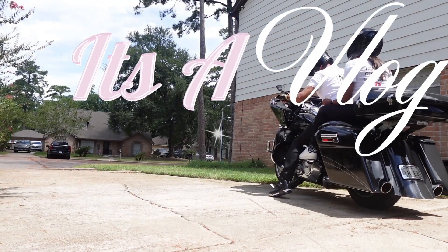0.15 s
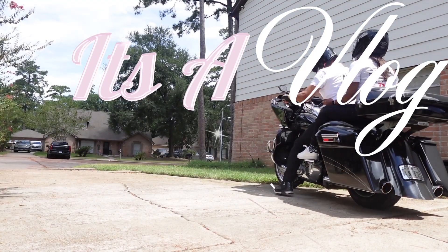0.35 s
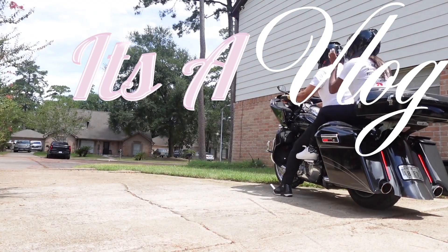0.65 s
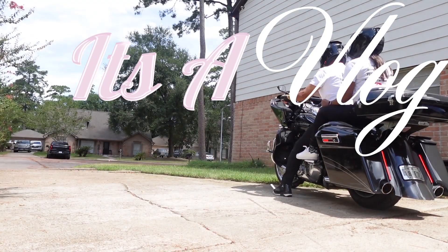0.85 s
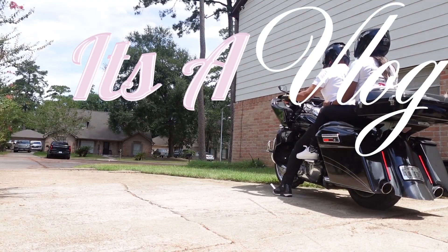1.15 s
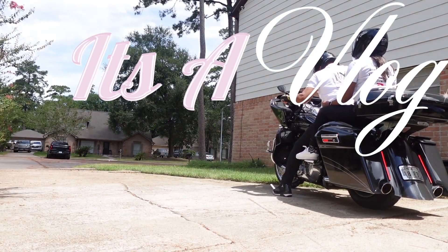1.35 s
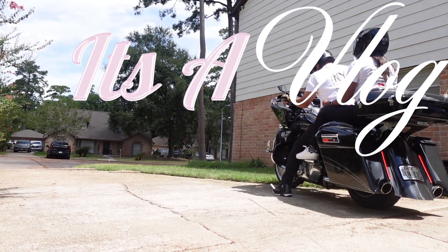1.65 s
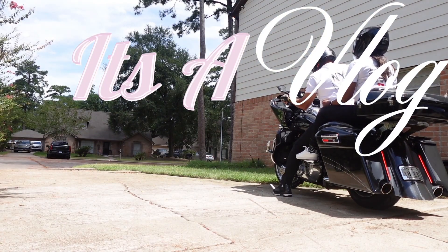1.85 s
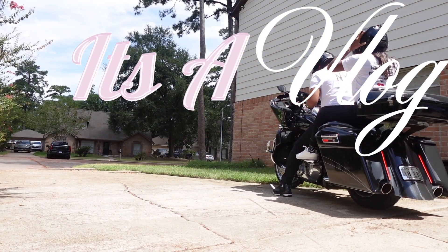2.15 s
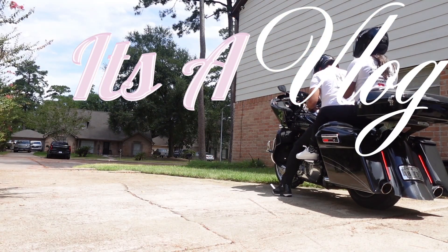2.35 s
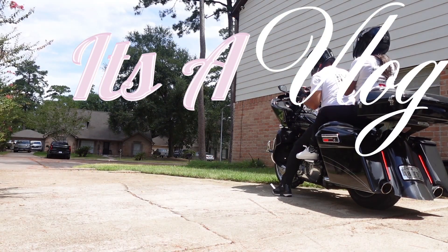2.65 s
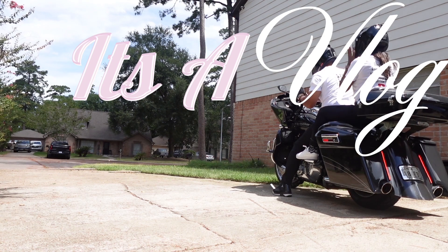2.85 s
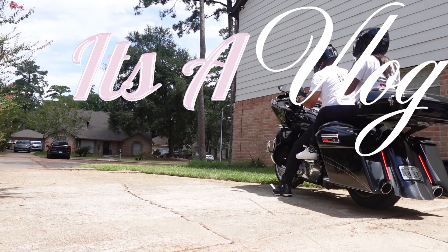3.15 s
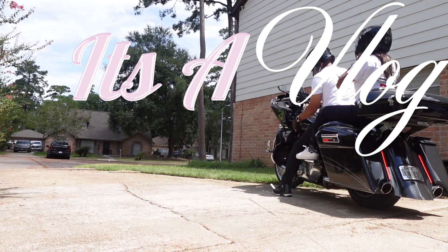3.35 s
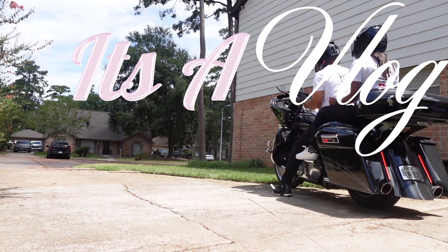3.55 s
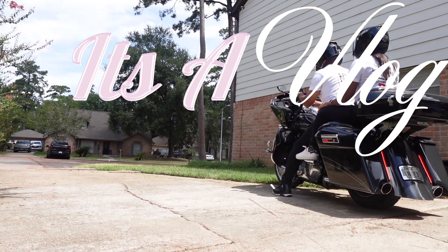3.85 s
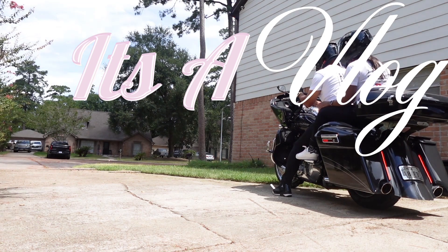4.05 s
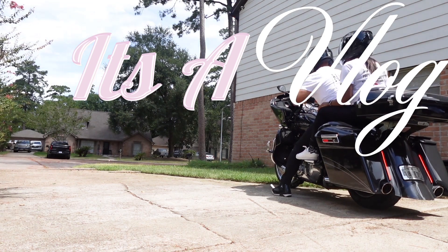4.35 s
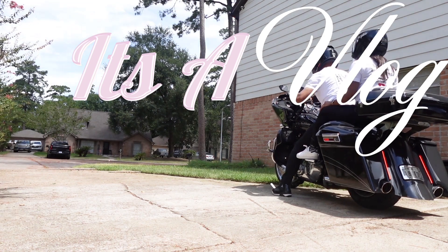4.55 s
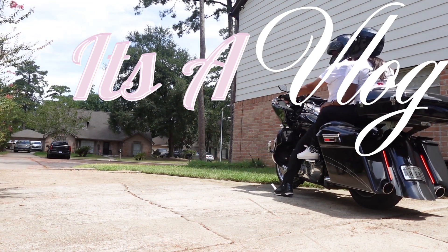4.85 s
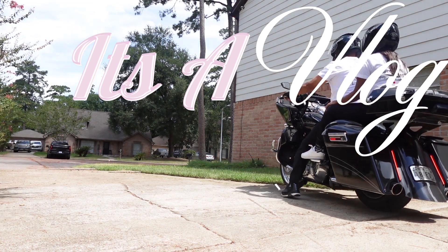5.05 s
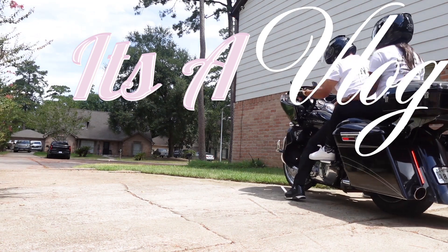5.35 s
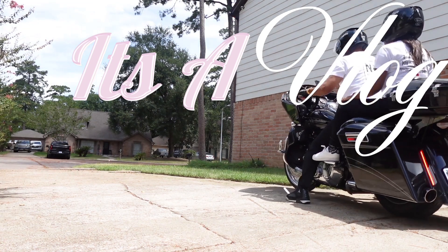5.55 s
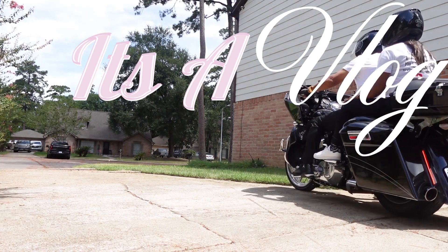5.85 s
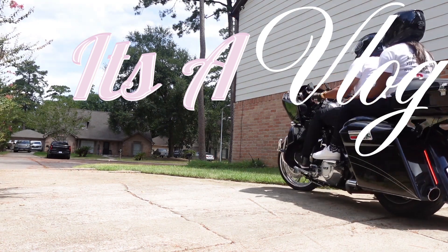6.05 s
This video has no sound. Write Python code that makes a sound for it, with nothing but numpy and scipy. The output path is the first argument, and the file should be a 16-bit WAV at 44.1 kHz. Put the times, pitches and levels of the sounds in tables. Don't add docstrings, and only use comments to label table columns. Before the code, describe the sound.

After quiet clicks and rustles, a motorcycle starter grinds briefly, the big twin catches, flares loudly, then settles to a fast, uneven idle with late metallic clacks.

```python
import sys
import numpy as np
from scipy import signal
from scipy.fft import rfft, irfft
from scipy.io import wavfile
from scipy.ndimage import uniform_filter1d

SR = 44100
rng = np.random.default_rng(int(sys.argv[2]) if len(sys.argv) > 2 else 0)


def store_wav(level_fs):
    pcm = np.round(np.clip(np.atleast_2d(level_fs), -1, 1) * 32767)
    wavfile.write(sys.argv[1], SR, pcm.T.astype(np.int16))


def elevation(decibels):
    levels = np.asarray(decibels, float)
    return 10 ** (levels / 20)


N = 273704
T = np.arange(N) / SR

# freq_hz, density_db
STREET_COLOUR = [(35, -69), (60, -61), (223, -23.5), (598, -3.5), (756, -3.5), (1100, -4), (2280, -8.5),
                 (2500, -8), (3560, -11), (4290, -8), (10500, -14.5), (15200, -14), (16400, -34)]
# freq_hz, level_db
HUMS = [(597.5, -62.5), (1098, -62.5), (1367, -67), (2476, -69), (4323, -72)]
# centre_s, length_s, low_rise_db, high_rise_db
RUSTLES = [
    (0.053, 0.027, 0, 9),
    (0.198, 0.048, 0.5, 2.5),
    (0.405, 0.022, 4, -1),
    (0.757, 0.058, 3, 4),
]
STREET_DB, RUSTLE_DB, SWELL_DB = -48.5, -51.5, .7
# start_s, peak_db, ring_hz, t60_s
CLICKS = [(0.3972, -26, 3900, 0.0056), (0.397, -29, 1700, .008), (.3978, -36, 7000, .004),
          (0.69, -27, 8160, 0.01), (0.6756, -19, 8300, 0.0063), (.6248, -29, 12000, .006),
          (.6252, -31, 5700, .006), (.676, -30, 15000, .005), (.676, -29, 6000, .006),
          (.543, -42, 11000, .004), (.3975, -42, 9000, .004), (.757, -42, 8000, .008),
          (0.7053, -33, 9100, 0.015), (0.7154, -34, 7280, 0.018), (0.7552, -38, 5840, 0.015),
          (1.123, -11, 4090, .03), (1, -19, 4350, 0.038), (5.4, -22, 3400, .012)]
# start_s, peak_db, ring_hz, t60_s
TAPS = [
    (0.196, -36, 1370, 0.046),
    (0.396, -39, 1110, 0.033),
    (0.7264, -29, 1350, 0.024),
    (0.787, -37, 1470, 0.029),
    (0.819, -45, 1080, 0.04),
]
# time_s, pitch_hz, level_db
PUMP = [
    (.72, 12500, -62),
    (.77, 12450, -51),
    (.98, 12100, -58),
]

# start_s, length_s, grind_db, thud_db
STROKES = [
    (0.991, .008, -22, -40),
    (0.997, 0.0093, -20, -30),
    (1.012, 0.013, -18.5, -35),
    (1.049, 0.0089, -22, -35),
    (1.06, 0.017, -19, -27.5),
    (1.088, 0.018, -18.5, -36),
    (1.099, 0.0054, -25, -25),
    (1.122, 0.011, -17.5, -60),
    (1.135, 0.054, -21, -20.5),
]
STROKE_RISE_S, STROKE_T60_S = 0.0021, 0.093
# freq_hz, density_db
GRIND = [(1180, -34), (2000, -7.5), (2790, -6.5), (4150, 0.5), (5170, -4.5), (5550, -3), (9910, -8),
         (14600, -3.5), (16400, -14)]
# freq_hz, width_hz, level_db
GEARS = [(3900, 350, -9), (4300, 200, -5), (5530, 130, 2.5), (6400, 200, -3), (7500, 320, -5),
         (8800, 200, -7)]

# time_s, rate_cycles_per_s
SPEED = [(1.13, 53.9), (1.26, 67.5), (1.467, 67.095), (1.577, 64.568), (1.654, 61.541), (1.841, 62.956),
         (1.98, 58.475), (2.061, 56.87), (2.152, 51.981), (2.361, 51.89), (3.37, 51.583), (3.525, 50.011),
         (6.264, 49.02)]
# centre_s, change_cycles_per_s
SURGES = [(2.415, 1.096), (3.059, -1.63), (3.114, 0.787), (3.375, 2.547), (3.83, 1.844), (4.026, -1.773),
          (4.433, 1.766), (4.679, 1.788), (4.968, 2.051), (5.155, -0.528), (5.228, -2.352), (5.596, 2.625),
          (5.895, -0.491), (6.01, 1.657)]
SURGE_S = .0713
# time_s, level_db
ENGINE = [(1.14, -22), (1.195, -16.5), (1.215, -12.5), (1.24, -10.5), (1.3, -11), (1.65, -11.5),
          (2.15, -13.5), (2.8, -13), (3.3, -13.5), (3.9, -12.5), (6.21, -13)]
# time_s, state (0 flare, 1 dropping, 2 settling, 3 pulling), unevenness_ratio
THROTTLE = [(1.14, 0, 2), (1.195, 0, 1.2), (1.225, 0, .5), (1.29, 0, .11), (1.49, 0, .11), (1.58, 1, .1),
            (2.04, 1, .12), (2.17, 2, .12), (3.4, 2, .12), (3.55, 2, .13), (6.2, 2, .14)]
# time_s, pulling_chance_ratio
PULL_CHANCE = [(2.2, .03), (3.4, .1), (3.5, .8), (3.62, .7), (3.68, .15), (3.88, .05), (3.93, .95),
               (4.05, .7), (4.3, .6), (4.36, .03), (4.5, .1), (4.78, .9), (4.95, .4), (5.08, .95),
               (5.45, .85), (5.52, .1), (5.65, .7), (6.2, .9)]
QUIET_SHARE = .38
CATCH_S = 1.14
# centre_s, length_s, change_db
DUCK = (6.133, .013, -8)

# multiple_of_cycle_rate, level_db
FLARE = [(1, -58), (2, -50), (3, -38), (4, -27), (5, -12), (6, -16), (7, -5), (8, -10), (9, -2), (10, -7),
         (11, -8), (12, -1), (13, -13), (14, 0), (15, -14), (16, -6), (17, -13), (18, -11), (19, -15),
         (20, -12), (21, -15), (22, -18), (23, -16), (24, -17), (25, -16), (26, -19), (27, -31), (28, -21),
         (29, -27), (30, -30), (31, -26), (32, -25), (33, -21), (34, -29), (35, -24), (36, -28)]
# multiple_of_cycle_rate, level_db
DROPPING = [(1, -59), (2, -60), (3, -41), (4, -24), (5, -14), (6, -22), (7, -8), (8, -9), (9, -4), (10, -4),
            (11, -7), (12, 0), (13, -3), (14, -10), (15, -10), (16, -6), (17, -8), (18, -6), (19, -15),
            (20, -11), (21, -13), (22, -20), (23, -22), (24, -24), (25, -19), (26, -23), (27, -24),
            (28, -24), (29, -21), (30, -24), (31, -26), (32, -29), (33, -29), (34, -30), (35, -32),
            (36, -35)]
# multiple_of_cycle_rate, level_db
SETTLING = [(1, -57), (2, -58), (3, -51), (4, -28), (5, -15), (6, -22), (7, -14), (8, -18), (9, -4),
            (10, -1), (11, -2), (12, 0), (13, -12), (14, -5), (15, -9), (16, -10), (17, -11), (18, -6),
            (19, -15), (20, -17), (21, -11), (22, -25), (23, -21), (24, -23), (25, -33), (26, -17),
            (27, -18), (28, -30), (29, -29), (30, -17), (31, -24), (32, -29), (33, -23), (34, -18),
            (35, -26), (36, -32)]
# multiple_of_cycle_rate, level_db
PULLING = [(1, -60), (2, -60), (3, -48), (4, -27), (5, -16), (6, -23), (7, -15), (8, -21), (9, -6),
           (10, -2), (11, -3), (12, -2), (13, -11), (14, -8), (15, -5), (16, -6), (17, -3), (18, -16),
           (19, -10), (20, -13), (21, -25), (22, -12), (23, -25), (24, -19), (25, -20), (26, -13),
           (27, -15), (28, -20), (29, -26), (30, -23), (31, -18), (32, -29), (33, -23), (34, -20),
           (35, -26), (36, -30)]
BITE = [0.022, 0.017, 0.035, 0.047]
# cycle_share, level_db
WAVES = [
    [(.072, -5.8), (.09, -12.2), (.186, -9.6), (.619, -9.5), (.715, -13.1), (.841, -8.5)],
    [(.027, -.9), (.457, -6.2), (.514, -7.7), (.522, -3.9), (.562, -5.1), (.699, -5.7)],
    [(.136, -5), (.155, -3.7), (.571, -6.6), (.796, -7.9), (.85, -3.3), (.998, -2.8)],
    [(.132, -2.3), (.163, 1), (.359, -9.1), (.583, -6.6), (.745, -6.8), (.786, -.1)],
]
PIPE = [
    (.834, .48),
    (1.424, -.61),
    (.218, 2.66),
    (.218, 3.1),
]
# cycle_share, level_db
FRONTS = [
    [(.231, -3.8), (.386, -7.9), (.8, -8.8), (.911, -2)],
    [(.152, -8.7), (.202, -8.3), (.6, -4.1), (.699, -6.9)],
    [(.184, -2.2), (.246, -15), (.551, -7.5), (.911, -3.6)],
    [(.182, -.6), (.297, -5.2), (.446, -6.9), (.557, -5.3), (.839, -6)],
]
FRONT_TWIST = [-1.4, 2.5, -1.09, 5.4]
FRONT_FROM = 20
FRONT_JITTER_CYCLES, FRONT_SCATTER_DB = .015, 14
LOPE_DB = 1.6

RASP_DB = [-23, -24, -17, -16]
RASP_HZ, RASP_WIDTH_HZ, RASP_SHARE = 830, 220, .0
# multiple_of_cycle_rate, level_db
ALTERNATE = [(13.5, -20), (15.5, -19), (16.5, -20), (20.5, -27), (25.5, -28)]

# cycle_share, knock_db, hiss_db
BEATS = [
    (.065, 0, 0),
    (.39, -9, -3),
    (.49, -11, -1),
    (.79, -10, -2),
]
# multiple_of_cycle_rate, decay_cycles, level_db, lag_cycles
KNOCK = [(41.5, .04, 11.5, .04), (33, .035, 1, .08), (64, .05, 2, 0), (79, .045, 0, .02)]
KNOCK_DB, KNOCK_CATCH_DB, KNOCK_EASE_S, KNOCK_DB_PER_S = -34, 10, .4, 1.2
REV_KNOCK_DB = 8
# freq_hz, density_db
GAS = [(710, -16), (1200, -16), (1370, -8), (1460, -6.5), (1590, -1.5), (2240, -10), (2610, -11.5),
       (3380, -8), (4670, -12.5), (5610, -12.5), (7350, -10.5), (8270, -13), (14800, -16.5), (15800, -19)]
# freq_hz, width_hz, level_db
CASING = [(3100, 360, 0.5), (5580, 290, 1), (11340, 380, -11), (4070, 120, -3.5)]
GAS_DB, GAS_CATCH_DB, GAS_EASE_S = -33.5, 4, .08
WHINE_DB, WHINE_DB_PER_S = -10, 1.8
# start_s, peak_db, ring_hz, t60_s
BANGS = [(1.141, -9, 686, 0.019), (1.15, -10, 1110, 0.016), (1.149, -10, 710, 0.022),
         (1.168, -6, 890, 0.017), (1.179, -6, 945, 0.016), (1.201, -21, 969, 0.016),
         (1.201, -6, 553, 0.033), (1.209, -9, 552, 0.02), (1.22, -5.5, 660, 0.039),
         (1.228, -14, 767, 0.013)]

# start_s, peak_db, t60_s, thump_db
CLACKS = [
    (1.185, -43, .03, -25),
    (1.76, -50, .03, -43),
    (2.859, -36, .03, -31),
    (4.722, -18, 0.055, -71),
    (5.867, -8.5, 0.049, -29),
    (5.878, -19, .05, -60),
    (6.113, -4.5, 0.029, -40),
    (6.124, -4, 0.047, -31),
    (6.134, -5, 0.058, -40),
    (6.198, -40, .01, -43),
]
# start_s, length_s, start_hz, end_hz, level_db
SQUEAKS = [(4.066, 0.01, 3100, 3030, -24), (4.717, 0.031, 5840, 5600, -24), (4.716, .02, 4300, 4170, -28),
           (4.717, .015, 6400, 6700, -30), (4.717, .018, 3200, 3400, -26),
           (4.801, 0.011, 5600, 5600, -23.5), (4.845, 0.035, 5300, 4600, -25),
           (4.846, 0.017, 6900, 6500, -31), (4.846, .02, 15400, 15100, -27),
           (4.887, .022, 14200, 14000, -32), (4.903, .012, 15800, 15200, -33)]
# freq_hz, left_minus_right_db
BALANCE_DB = [(125, 0), (250, -.2), (500, -.6), (1000, -1.1), (2000, -1.8), (4000, -3.2), (8000, -3.2),
              (12000, -2.6)]
BASS_CUT_HZ = 201


def level(x, db):
    return x * elevation(db) / np.sqrt(np.mean(x ** 2))


def noise():
    return rng.standard_normal(N)


def columns(table):
    s, *cols = np.transpose(table)
    return [np.interp(T, s, c) for c in cols]


def colour(x, points):
    hz, db = np.transpose(points)
    log_f = np.log(np.maximum(np.fft.rfftfreq(N, 1 / SR), 1))
    return irfft(rfft(x) * elevation(np.interp(log_f, np.log(hz), db)), N)


def ring(x, hz, width_hz):
    return signal.lfilter(*signal.iirpeak(hz, hz / width_hz, SR), x)


def rings(x, modes):
    return sum(elevation(db) * ring(x, hz, width_hz) for hz, width_hz, db in modes)


def walk(rate_hz):
    knots_s = np.arange(0, N / SR + 1, 1 / rate_hz)
    return np.interp(T, knots_s, rng.standard_normal(len(knots_s)))


def fade(start_s, t60_s, rise_s=.0003):
    t = np.maximum(T - start_s, 0)
    return (1 - np.exp(-t / rise_s)) * elevation(-60 * t / t60_s)


def bump(centre_s, length_s):
    return np.exp(-((T - centre_s) / length_s) ** 2)


def cycle_luck(turn, count):
    return rng.standard_normal((500, count))[np.floor(turn).astype(int) + 1].T


def street():
    low_db = STREET_DB + SWELL_DB * walk(6.8) + sum(d * bump(s, length) for s, length, d, _ in RUSTLES)
    high_db = RUSTLE_DB + sum(d * bump(s, length) for s, length, _, d in RUSTLES)
    wash = colour(noise(), STREET_COLOUR)
    low = signal.sosfilt(signal.butter(2, 2700, fs=SR, output="sos"), wash)
    hums = sum(elevation(db + 5.0) * level(ring(noise(), hz, 6.3), 0) for hz, db in HUMS)
    return level(low, 0) * elevation(low_db) + level(wash - low, 0) * elevation(high_db) + hums


def hits(table):
    out = 0
    for start_s, db, hz, t60_s in table:
        tone = np.sin(2 * np.pi * hz * (T - start_s))
        scrape = colour(noise(), [(hz / 3, -15), (hz, 0), (hz * 2, -4)])
        out = out + elevation(db) * fade(start_s, t60_s) * (tone + 0.46 * scrape)
    return out


def fuel_pump():
    hz, db = columns(PUMP)
    whine = np.sin(2 * np.pi * np.cumsum(hz) / SR)
    return elevation(db + 3 * walk(58)) * whine * (T > .72) * (T < 1)


def starter():
    teeth = colour(noise() * elevation(2.2 * walk(200)), GRIND)
    gears = sum(rings(teeth, [gear]) * elevation(5 + 3 * walk(40)) for gear in GEARS)
    grind = level(teeth + gears, 0)
    thud = level(rings(noise(), [(640, 98, -8), (1120, 400, 6)]), 0)
    out = 0
    for start_s, length_s, grind_db, thud_db in STROKES:
        rise = np.clip((T - start_s) / STROKE_RISE_S, 0, 1)
        fall = elevation(-60 * np.maximum(T - start_s - length_s, 0) / STROKE_T60_S)
        out = out + rise * fall * (grind * elevation(grind_db) + thud * elevation(thud_db))
    return out


def burn(turn):
    cycle = np.floor(turn - QUIET_SHARE).astype(int) + 1
    start = np.searchsorted(cycle, cycle)
    pulls = rng.random(500)[cycle] < columns(PULL_CHANCE)[0][start]
    return uniform_filter1d(pulls * (T > PULL_CHANCE[0][0]) * 1., size=60)


def gathered(k, pulses):
    return sum(elevation(db) * np.exp(-2j * np.pi * k * share) for share, db in pulses)


def exhaust(turn, uneven, state):
    out, states = 0, np.arange(len(WAVES))
    ragged = np.minimum(uneven, .3)
    slip = FRONT_JITTER_CYCLES * ragged * walk(170)
    push = elevation(FRONT_SCATTER_DB * ragged * walk(170))
    for rows in zip(FLARE, DROPPING, SETTLING, PULLING):
        k = rows[0][0]
        size = elevation(np.array([row[1] + bite * k for row, bite in zip(rows, BITE)]))
        if k >= FRONT_FROM:
            phase = [twist + np.angle(gathered(k, fronts)) for fronts, twist in zip(FRONTS, FRONT_TWIST)]
        else:
            phase = [np.angle(gathered(k, waves)) + twist - 2 * np.pi * lag * np.log(k)
                     for waves, (lag, twist) in zip(WAVES, PIPE)]
        wave = np.interp(state, states, size * np.exp(1j * np.array(phase)))
        spread = uneven * (k / 12) ** .9
        if k >= FRONT_FROM:
            wave = wave * push * np.exp(2j * np.pi * k * slip)
            spread = spread * .45
        wobble = 1 + spread * (walk(45) + 1j * walk(45))
        out = out + np.real(wobble * wave * np.exp(2j * np.pi * k * turn)) / np.sqrt(1 + spread ** 2)
    late = turn - .4
    lope = np.sin(np.pi * np.clip(late % 1 / .7, 0, 1)) ** 2
    return out * elevation(LOPE_DB * cycle_luck(late, 1)[0] * lope)


def rasp(turn, state):
    gate = 1 + .7 * np.cos(2 * np.pi * (turn - RASP_SHARE))
    hiss = ring(ring(noise(), RASP_HZ, RASP_WIDTH_HZ), RASP_HZ, 2.0 * RASP_WIDTH_HZ) * gate
    halves = sum(elevation(db + 4 * walk(9)) * np.sin(2 * np.pi * (m * turn + .2 * walk(9))) for m, db in ALTERNATE)
    return level(hiss, 0) * elevation(np.interp(state, np.arange(len(RASP_DB)), RASP_DB)) + halves


def valve_knocks(turn, state):
    out = 0
    for share, db, _ in BEATS:
        if share == BEATS[2][0]:
            db = db + REV_KNOCK_DB * np.clip(2 - state, 0, 1)
        since = (turn - share) % 1
        strength, detune, *own = np.clip(cycle_luck(turn - share, 2 + len(KNOCK)), -2, 2)
        pitch = 1 + 0.023 * detune - .055 * np.clip(2 - state, 0, 2)
        ripple = 0
        for (multiple, decay, mode_db, lag), luck in zip(KNOCK, own):
            after = since - lag
            shape = np.exp(-after / decay) * (1 - np.exp(-np.maximum(after, 0) / .012))
            ripple = ripple + elevation(mode_db + 1.8 * luck) * shape * np.sin(2 * np.pi * multiple * pitch * after)
        out = out + elevation(db + 1.8 * strength) * ripple
    return level(out, 0)


def gas_hiss(turn):
    puffs = .85
    for share, _, db in BEATS:
        luck = np.clip(cycle_luck(turn - share, 1)[0], -2, 2)
        puffs = puffs + elevation(db + 2.5 * luck) * np.exp(-((turn - share) % 1) / .07)
    gas = colour(noise() * puffs, GAS)
    return level(gas + rings(gas, CASING), 7.2)


def gear_whine():
    hz = 68 * columns(SPEED)[0] + 40 * walk(22) + 150 * bump(6.06, .07)
    whine = (walk(60) + 2.2) * np.sin(2 * np.pi * (np.cumsum(hz) / SR + .2 * walk(130)))
    return level(whine, WHINE_DB)


def engine():
    since_s = np.maximum(T - CATCH_S, 0)
    note_db = columns(ENGINE)[0] + DUCK[2] * bump(*DUCK[:2])
    knock_db = KNOCK_DB + KNOCK_CATCH_DB * np.exp(-since_s / KNOCK_EASE_S) + KNOCK_DB_PER_S * since_s
    gas_db = GAS_DB + GAS_CATCH_DB * np.exp(-since_s / GAS_EASE_S)
    state, uneven = columns(THROTTLE)
    speed = columns(SPEED)[0] + sum(change * bump(s, SURGE_S) for s, change in SURGES)
    turn = np.cumsum(speed) / SR - .129 + .0028 * walk(40)
    state = state + burn(turn)
    note = exhaust(turn, uneven, state)
    note = note / np.sqrt(uniform_filter1d(note ** 2, size=SR // 8)) + rasp(turn, state)
    gas = gas_hiss(turn) + gear_whine() * elevation(WHINE_DB_PER_S * since_s)
    mix = elevation(note_db) * note + elevation(knock_db) * valve_knocks(turn, state) + elevation(gas_db) * gas
    return mix * np.clip((T - CATCH_S) / 0.0021, 0, 1)


def clacks():
    metal = [(1500, -2.0), (4000, -4.0), (10500, -4.0), (16000, -5)]
    return sum(fade(s, t60_s) * elevation(db) * colour(noise(), metal) for s, db, t60_s, _ in CLACKS)


def squeaks():
    out = 0
    for start_s, length_s, start_hz, end_hz, db in SQUEAKS:
        u = np.clip((T - start_s) / length_s, 0, 1)
        hz = (start_hz + (end_hz - start_hz) * u) * (1 + 0.0119 * walk(200))
        tone = np.sin(2 * np.pi * np.cumsum(hz) / SR)
        out = out + elevation(db + 3.3 * walk(250)) * np.sin(np.pi * u) * tone
    return out


def scene():
    mono = street() + hits(TAPS + CLICKS) + fuel_pump() + starter()
    mono = mono + engine() + hits(BANGS) + clacks() + squeaks()
    return np.array([colour(mono, [(hz, side * db / 2) for hz, db in BALANCE_DB]) for side in (1, -1)])


def band_limit(x):
    return signal.sosfilt(signal.butter(12, 16510, fs=SR, output="sos"), x)


def record(dry):
    x = np.tanh(0.87 * dry) / 0.93
    cut = signal.sosfilt(signal.butter(8, BASS_CUT_HZ, "high", fs=SR, output="sos"), x)
    cut = signal.sosfilt(signal.ellip(10, .3, 50, 15900, fs=SR, output="sos"), cut)
    thumps = sum(elevation(thump_db) * fade(s, 0.01, rise_s=0.00085) for s, _, _, thump_db in CLACKS)
    leak = elevation(-20.0) * ring((x - dry) * (1 + walk(42)), 60., 120.)
    return band_limit(cut + leak + thumps)


dry = scene()
out = record(dry)
store_wav(out)
```